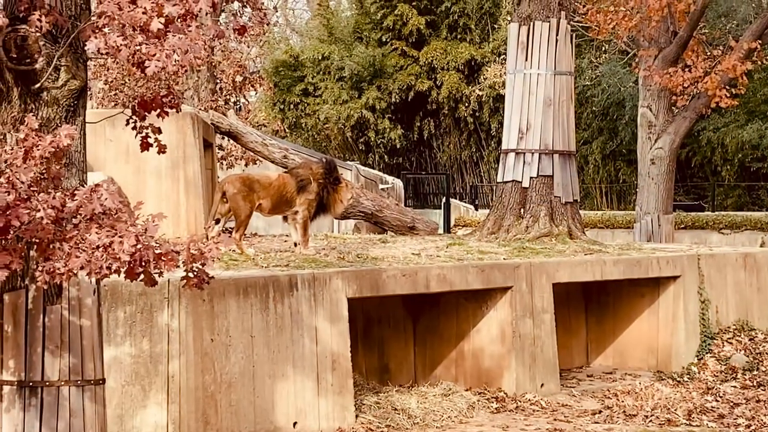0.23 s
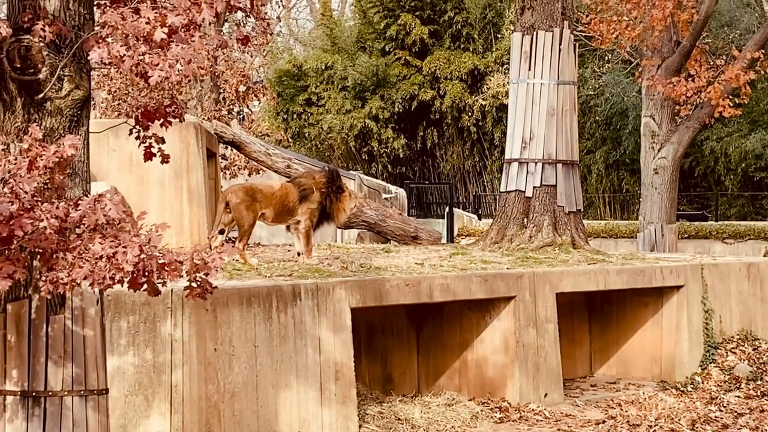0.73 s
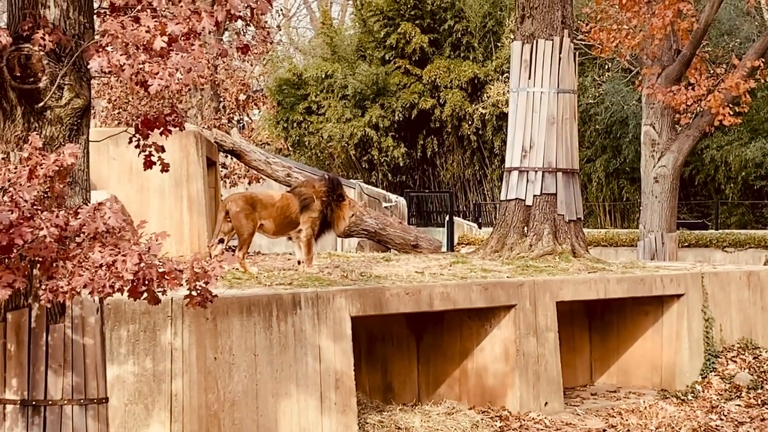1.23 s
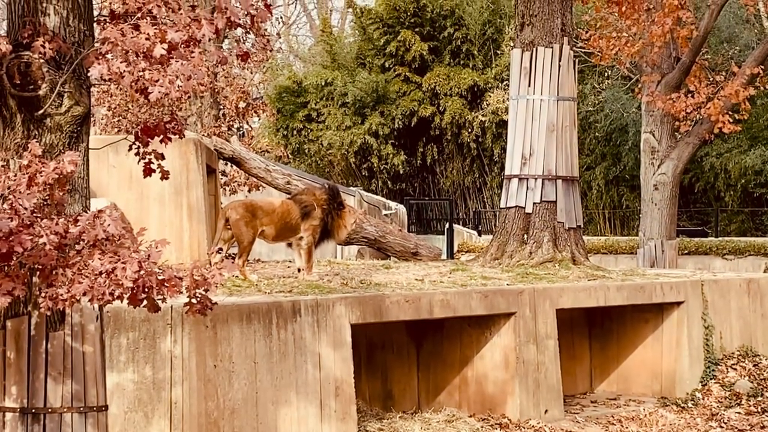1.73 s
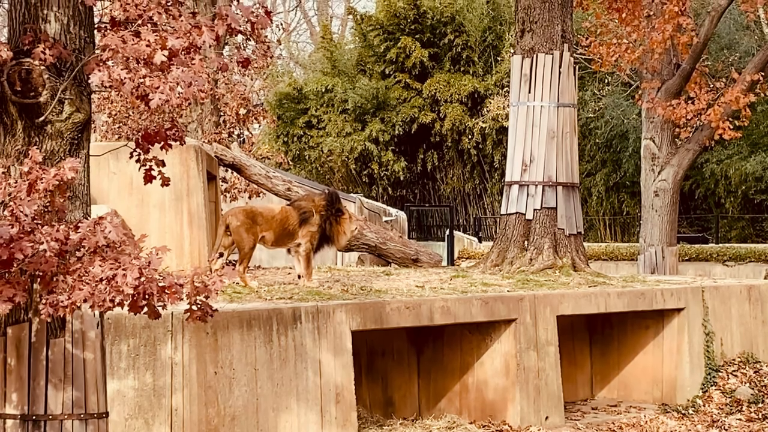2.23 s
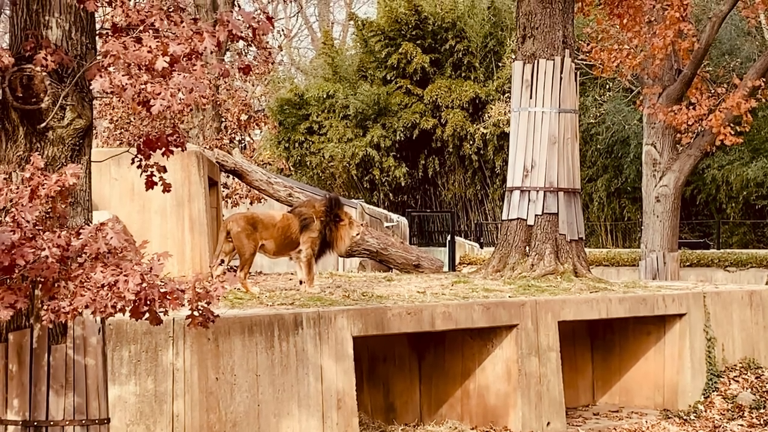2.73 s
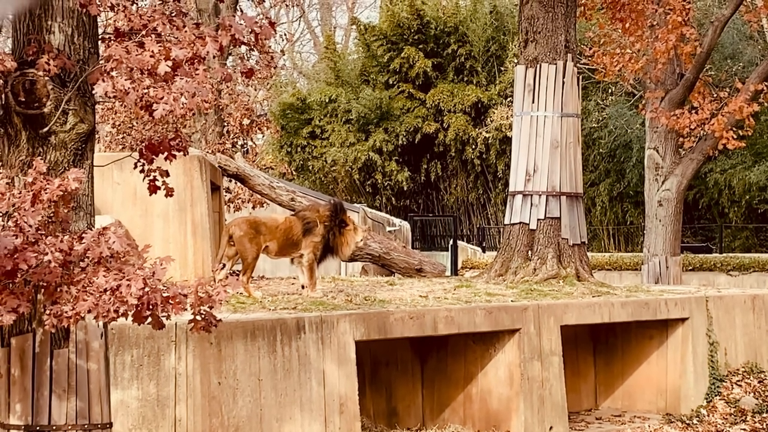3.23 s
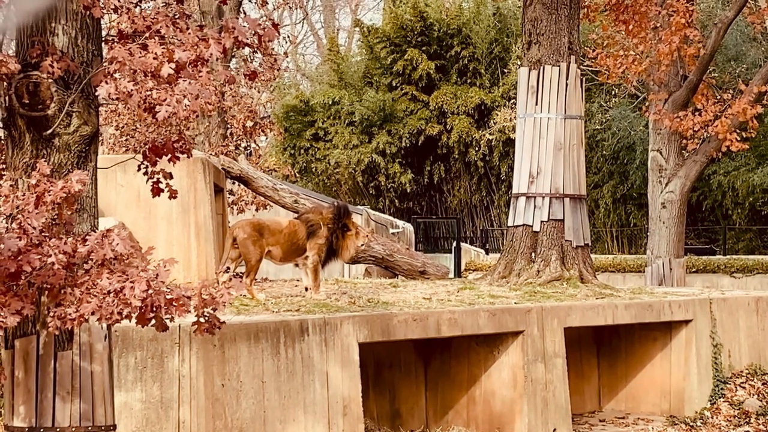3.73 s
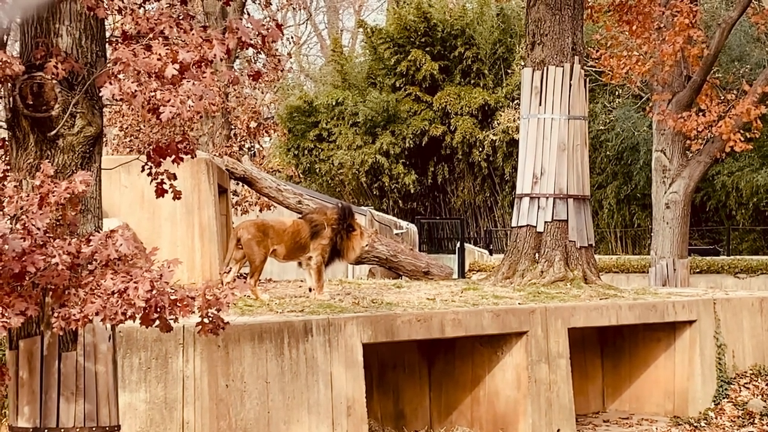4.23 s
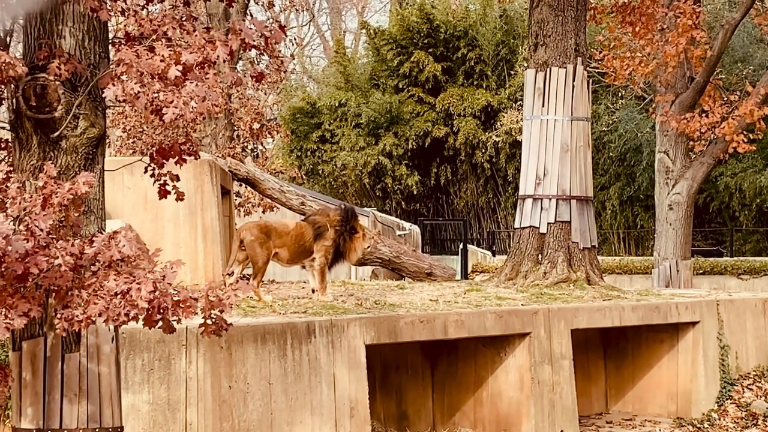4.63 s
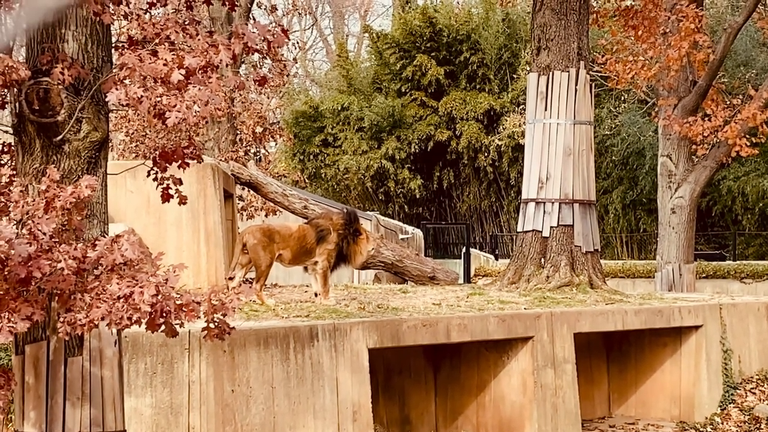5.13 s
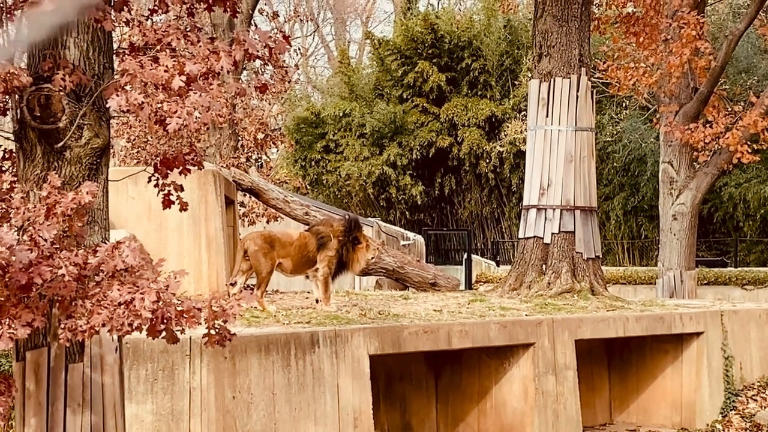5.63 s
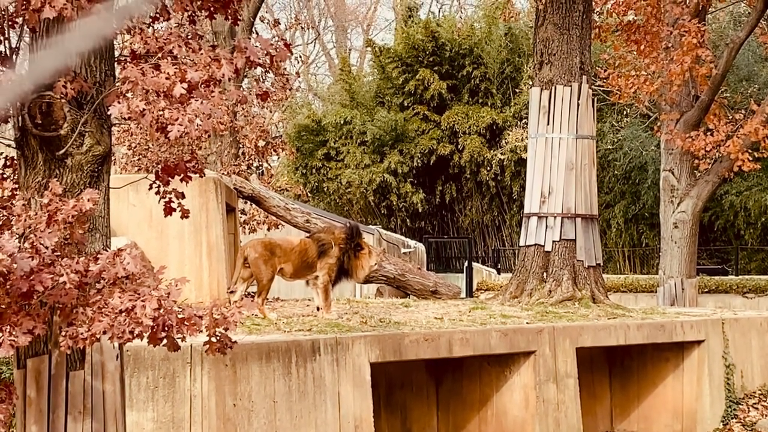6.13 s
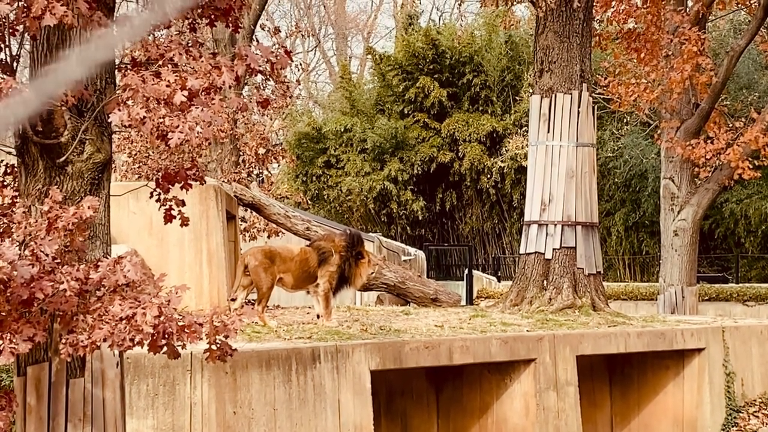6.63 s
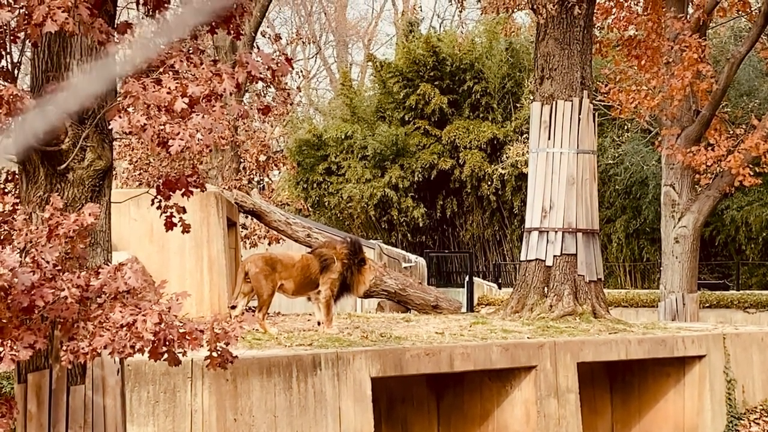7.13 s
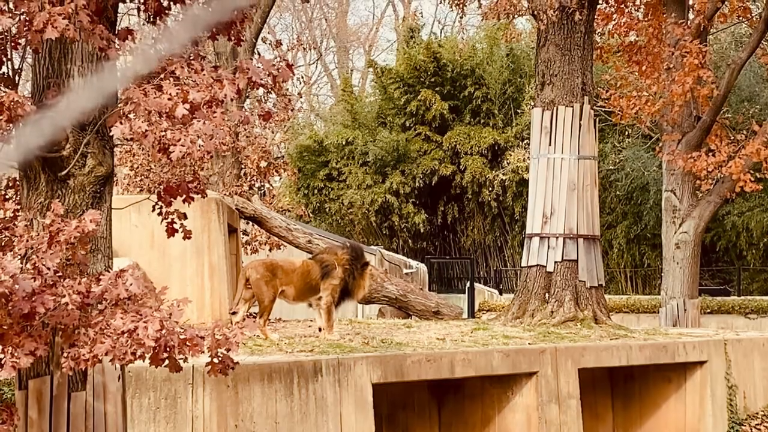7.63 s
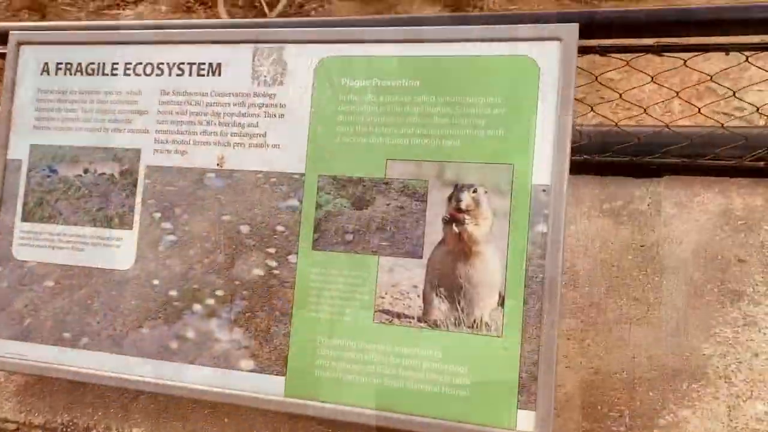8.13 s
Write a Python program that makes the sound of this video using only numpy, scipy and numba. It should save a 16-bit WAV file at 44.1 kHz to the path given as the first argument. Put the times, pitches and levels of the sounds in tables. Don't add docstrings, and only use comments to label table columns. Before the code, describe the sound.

A male lion gives two long deep roars, then five rough fading grunts, echoing off concrete walls over low distant town rumble.

```python
import sys
import numpy as np
from scipy import signal
from scipy.io import wavfile
from scipy.ndimage import uniform_filter1d
from numba import njit

SR = 44100
rng = np.random.default_rng(int(sys.argv[2]) if len(sys.argv) > 2 else 0)


def unload_audio(sound):
    columns = np.transpose(np.atleast_2d(sound))
    steps = np.round(np.clip(columns, -1, 1) * 32767)
    wavfile.write(sys.argv[1], SR, steps.astype(np.int16))


def linear_from_db(decibels):
    return 10 ** (np.asarray(decibels, float) / 20)


N = 369381


def level(x, db):
    return x * linear_from_db(db) / np.sqrt(np.mean(x ** 2))


@njit
def svf(x, hz, width):
    y, band, low = np.empty(len(x)), 0., 0.
    g, k = np.tan(np.pi * hz / SR), width / hz
    for i in range(len(x)):
        v = (band + g * (x[i] - low)) / (1 + g * (g + k))
        band = 2 * v - band
        low = low + 2 * g * v
        y[i] = k * v
    return y


def walk(rate, size):
    hold = int(SR / rate)
    steps = np.repeat(rng.standard_normal(size // hold + 1), hold)
    return 1.3 * uniform_filter1d(uniform_filter1d(steps, hold), hold)[:size]


def tract(x, modes):
    out = 0
    for k, (hz, width, db) in enumerate(modes):
        once = svf(x, 1. * hz, 1.36 * width)
        out = out + (-1) ** k * linear_from_db(db) * svf(once, 1. * hz, 1.36 * width)
    return out


def stereo(mid, side):
    return np.array([mid + side, mid - side])


def ambience(shape, db):
    out, swell = 0, walk(0.33, N)
    at_hz, at_db = np.transpose(shape)
    for hz in 25 * 2 ** np.arange(0, 9.4, 1 / 3):
        mid, side = (svf(svf(rng.standard_normal(N), hz, hz / 3), hz, hz / 3) for _ in range(2))
        band_db = np.interp(np.log(hz), np.log(at_hz), at_db) + 0.25 * swell + 1.2 * walk(9.4, N)
        out = out + linear_from_db(band_db) * stereo(mid, min(.04 + hz / 2000.0, .4) * side)
    return level(out, db)


def town():
    # f/Hz, level/dB per Hz
    spectrum = [(22, -63), (37, -11), (60, 10), (120, 9.5), (250, -5), (400, -8.5), (800, -26),
                (1600, -35.5), (3000, -43), (6000, -56), (12000, -61.5), (16000, -69)]
    return ambience(spectrum, -38)


def effort_db(s, row, fall_db_per_s, hold_s=0, jump_db=-12, swell_s=0.13):
    start, release, db = row[:3]
    rise = np.interp(s - start, (0, .035, swell_s), (jump_db + 12 - 31, jump_db, 0))
    return db + rise - fall_db_per_s * np.maximum(s - release - hold_s, 0)


def clean_voice(s, row, hum_hz, hum_db, rough, beat):
    # t/s, half length/s, depth/dB
    breaks = [(0.201, 0.03, -9), (0.292, 0.018, -6.5), (0.662, .03, -4.5), (2.23, 0.044, -19.5),
              (3.244, 0.022, -16), (3.33, 0.011, -8), (3.418, 0.017, -5), (4.124, 0.019, -20),
              (4.217, 0.046, -11.5), (4.301, 0.022, -8), (5.017, 0.035, -8.5), (5.146, .03, -8),
              (6.107, 0.01, -9.5), (6.22, 0.0077, -9), (6.311, .03, -11.5), (7.358, 0.08, -12),
              (7.522, 0.028, -28.5)]
    size = len(s)
    hum_db = hum_db + sum(db * np.clip(1 - ((s - at) / half) ** 2, 0, 1) for at, half, db in breaks)
    over_db = effort_db(s, row, 90.5, hold_s=0.045) + row[4] + 4.5 * walk(14, size)
    turns = np.cumsum(hum_hz * (1 + .02 * rough * walk(40, size))) / SR
    throb = linear_from_db(3.5 * rough * walk(30, size))
    beat_hz, share = beat
    partner = share * np.sin(2 * np.pi * (turns - beat_hz * np.arange(size) / SR))
    hum = np.sqrt(2) * (np.sin(2 * np.pi * turns) + partner) * throb * linear_from_db(hum_db)
    over = np.sqrt(2) * np.sin(4 * np.pi * turns) * linear_from_db(over_db - 17 * rough)
    return hum + over, turns


def fold_slaps(turns, rough):
    size = len(turns)
    beats = np.arange(1, int(turns[-1] / 2))
    timing, strength = rng.standard_normal((100, 2))[:len(beats)].T
    when = np.interp(2 * (beats + .15 * rough * timing), turns, np.arange(size))
    slaps = np.zeros(size)
    slaps[when.astype(int)] = linear_from_db(5 * rough * strength)
    puffs = 1.2 + signal.lfilter([1], [1, -np.exp(-1 / (0.009 * SR))], slaps)
    air = level(puffs * rng.standard_normal(size), 0)
    return level(slaps, 0), air


def chest_thump(slaps, air, mouth_db, chest_db):
    lag = np.exp(-1 / (.25 * SR))
    effort = signal.lfilter([1 - lag], [1, -lag], linear_from_db(mouth_db))
    return level(tract(.5 * slaps + air, [(56.5, 28, 0.0), (95, 14, -8)]), chest_db) * effort


def throat_growl(slaps, air, throat_db, rough):
    # f/Hz, width/Hz, level/dB
    throat = [(201, 53, 4), (307.5, 49.2, 8), (388.8, 103, 3.5), (469.4, 69, 0.5), (560, 94, -6.5),
              (672, 61, -20)]
    (low_hz, low_width, low_db), *upper = throat
    modes = [(low_hz, low_width, low_db + 7.5 * rough)] + upper
    return level(tract(slaps + 2.2 * rough * air, modes), 0) * linear_from_db(throat_db)


def mouth_rasp(s, row, slaps, air, mouth_db, rough, fangs_db):
    # f/Hz, width/Hz, level/dB
    mouth = [(766.4, 51.3, 9.5), (1020, 99, 4), (1200, 100, 0.5), (1429, 139, -9.5)]
    # f/Hz, width/Hz, level/dB
    fangs = [(1783, 110, 0), (2053, 120, -1), (2276, 110, 1), (2566, 180, -0.5), (2980, 420, -3.5)]
    # f/Hz, width/Hz, level/dB
    hiss_bands = [(3960, 2040, -37), (5500, 1700, -47), (6800, 710, -51.5), (11400, 1700, -57),
                  (15000, 2000, -64)]
    size = len(s)
    hiss = sum(level(tract(rng.standard_normal(size), [mode]), mode[2]) for mode in hiss_bands)
    jaws = linear_from_db(effort_db(s, row, 89.5, hold_s=0.026, jump_db=-15, swell_s=0.18))
    bite = (.5 * slaps + air) * linear_from_db(3.5 * rough * walk(60, size))
    rasp = level(tract(0.42 * slaps + air, fangs), fangs_db)
    return level(tract(bite, mouth), 0) * linear_from_db(mouth_db) + (rasp + 5 * hiss) * jaws


def call(row, hum_rows, rough, chest_db, fangs_db, beat):
    corner_s, *columns = np.transpose(hum_rows)
    t = np.arange(int(corner_s[0] * SR), min(int(corner_s[-1] * SR), N))
    s = t / SR
    hum_hz, hum_db = (np.interp(s, corner_s, c) for c in columns)
    mouth_db = effort_db(s, row, 119)
    throat_db = effort_db(s, row, 107.5) + row[3] + 0.33 * 4.5 * walk(14, len(t))
    voice, turns = clean_voice(s, row, hum_hz, hum_db, rough, beat)
    slaps, air = fold_slaps(turns, rough)
    rasp = chest_thump(slaps, air, mouth_db, chest_db) + throat_growl(slaps, air, throat_db, rough)
    rasp = rasp + mouth_rasp(s, row, slaps, air, mouth_db, rough, fangs_db)
    rise = (t - t[0] + N * (t[0] == 0)) / (0.005 * SR)
    fade = np.clip(np.minimum(rise, (t[-1] - t) / (.06 * SR)), 0, 1)
    out = np.zeros((2, N))
    out[:, t] = np.array([voice, rasp]) * fade
    return out


@njit
def walls(x, lags, gain, damp):
    line, soft, out = np.zeros((8, 8192)), np.zeros(8), np.zeros((2, len(x)))
    for i in range(len(x)):
        total = 0.
        for k in range(8):
            soft[k] += (1 - damp) * (gain[k] * line[k, (i - lags[k]) & 8191] - soft[k])
            total += soft[k]
            out[k % 2, i] += soft[k]
        for k in range(8):
            line[k, i & 8191] = x[i] + soft[k] - total / 4
    return out


def yard_echo(tone, rasp):
    lags = np.array([1031, 1523, 1987, 2467, 3049, 3671, 4327, 5153])
    gain = linear_from_db(-60 * lags / SR / 1.123)
    return linear_from_db(-21.5) * walls(0.79 * tone + rasp + 1e-18, lags, gain, 0.086)


def sags():
    # t/s, length/s, from f/Hz, to f/Hz, level/dB
    partials = [(0.108, 0.078, 394, 422, -21.5), (0.185, 0.099, 423.6, 416, -26),
                (.56, 0.11, 414.5, 406, -29), (0.659, 0.24, 125, 112.6, -26.5),
                (.93, 0.079, 105, 90.3, -34.5), (1.117, 0.2, 344, 359, -45), (1.349, 0.24, 343, 343, -49),
                (1.818, 0.094, 377.7, 382.6, -30.5), (1.937, 0.12, 381, 360, -24),
                (2.19, 0.097, 126.9, 104, -26.5), (3.065, 0.1, 419, 446.5, -32),
                (3.567, 0.12, 103.2, 95, -37), (6.109, 0.17, 308.4, 337, -35),
                (7.252, 0.042, 404, 371, -35.5)]
    out, waver, flutter = np.zeros(N), 1 + .02 * walk(25, N), linear_from_db(3 * walk(30, N))
    for s, length, from_hz, to_hz, db in partials:
        at = np.arange(int(s * SR), int((s + length) * SR))
        hz = np.linspace(from_hz, to_hz, len(at)) * waver[at]
        out[at] += linear_from_db(db) * 2 * np.hanning(len(at)) * np.sin(2 * np.pi * np.cumsum(hz) / SR)
    return out * flutter


def ticks():
    # t/s, level/dB, f/Hz, width/Hz, t60/s
    snaps = [(1.55, -79, 992, 1970, 0.036), (2.696, -75, 1200, 3110, 0.022),
             (2.758, -51, 1834, 4880, 0.042), (4.491, -48, 854, 1200, 0.045),
             (5.658, -45, 550, 1200, 0.095), (5.667, -53, 1492, 6070, 0.078),
             (6.556, -63, 4502, 2960, 0.21), (6.927, -66, 900, 2000, .04), (7.017, -72, 890, 2000, .04),
             (7.785, -60, 2090, 600, .05), (7.871, -61, 5500, 3020, 0.061)]
    out, t = np.zeros(N), np.arange(SR // 5) / SR
    for s, db, hz, width, t60 in snaps:
        burst = level(tract(rng.standard_normal(len(t)), [(hz, width, 0)]), db) * 1000 ** (-t / t60)
        out[int(s * SR):int(s * SR) + len(t)] += burst
    return out


def grunt_hum(row, hum):
    (start, release, *_), (hz, db, peak, end) = row, hum
    scoop_hz, drop_s, drop_db = .94 * hz, release + 0.16, db - 9
    return [(start, scoop_hz, db - 30), (start + .095, scoop_hz, db - 5),
            (max(peak, start + .13), hz, db), (drop_s, hz, drop_db),
            (end, hz, drop_db - 26 * (end - drop_s))]


def lion_calls():
    # t/s, breath lets go/s, effort level/dB, throat over effort/dB, overtone over effort/dB
    calls = [
        (-.12, 0.622, -34, 9, 7.5),
        (1.685, 2.139, -37, 11.5, 5.5),
        (2.959, 3.205, -37, 9, 13),
        (3.914, 4.129, -38.5, 12, 4),
        (4.865, 5.084, -38.5, 12.5, 6),
        (5.884, 6.105, -39.5, 11, 5),
        (7.12, 7.382, -43.5, 13, 11),
    ]
    # t/s, f/Hz, level/dB
    roar_hum = [
        [(0.0, 156.7, -22), (0.082, 154.3, -10.5), (0.308, 158.8, -21.5), (0.392, 159.3, -9),
         (0.542, 155.2, -12.5), (0.686, 161.8, -20.5), (0.808, 156.3, -23.5), (1.086, 155.9, -31),
         (1.1, 157.9, -51)],
        [(1.7, 141, -47.5), (1.774, 141.8, -23.5), (1.806, 146, -31), (1.834, 150.3, -11),
         (1.968, 154.1, -12.5), (2.024, 147.2, -11.5), (2.344, 146.8, -27.5), (2.43, 153.2, -25.5),
         (2.56, 149, -31.5)],
    ]
    # f/Hz, level/dB, peak t/s, dies t/s
    grunt_hums = [(147.8, -18, 3.19, 3.54), (130.2, -18, 4.16, 4.49), (132, -19, 5.0, 5.6),
                  (129.7, -19.5, 6.14, 6.6), (126.8, -19, 7.27, 7.8)]
    rough = [.2, .25, .35, .6, .7, .65, .6]
    chest_db = [-16, 6.5, 10.5, 7.5, 10.5, 10, 12]
    fangs_db = [-12, -10.5, -10.5, -12, -11.5, -12.5, -13.5]
    # beats/Hz, share
    beats = [(7.9, 0.07), (11, 0.18), (17.07, 0.61), (13, 0.36), (17, .5), (14, 0.45), (11.5, 0.17)]
    hums = list(roar_hum) + [grunt_hum(*each) for each in zip(calls[2:], grunt_hums)]
    return sum(call(*each) for each in zip(calls, hums, rough, chest_db, fangs_db, beats))


def path():
    # f/Hz, level/dB per Hz
    spectrum = [(30, -16.5), (100, 0.5), (250, -15), (800, -17), (1600, -31), (2600, -30.5), (4000, -36),
                (8000, -42.5), (11000, -43.5), (16000, -50)]
    whir = level(tract(rng.standard_normal(N), [(2070, 220, 0)]), -69.5) * linear_from_db(3 * walk(13, N))
    return ambience(spectrum, -51.5) + whir


def scene():
    # start t/s, end t/s
    dissolve_s = (7.49, 8.22)
    tone, rasp = lion_calls()
    tone = tone + sags()
    lion = tone + rasp
    left, right = yard_echo(tone, rasp)
    echo_side = .9 * svf(left - right, 1000., 2500.) + .3 * svf(left - right, 140., 100.)
    ground_side = .25 * svf(np.pad(lion, (6, 0))[:N], 900., 700.) - 0.084 * svf(lion, 280., 260.)
    yard = stereo(lion + left + right + ticks(), echo_side + ground_side) + town()
    mix = np.interp(np.arange(N) / SR, dissolve_s, (0, 1))
    return yard * (1 - 0.62 * mix) + path() * mix


def low_pass(x):
    return signal.sosfilt(signal.butter(12, 15700, fs=SR, output="sos"), x)


def record(dry):
    # low f/Hz, high f/Hz
    dead_hz = [(8400, 9500), (12800, 13900)]
    whine = linear_from_db(-68) * np.cos(2 * np.pi * 12000 * np.arange(N) / SR)
    rounded = np.tanh(1.132 * dry) / 1.078 * (1 + whine)
    x = signal.sosfilt(signal.butter(2, 30., "high", fs=SR, output="sos"), rounded)
    for band in dead_hz:
        x = signal.sosfilt(signal.butter(3, band, "bandstop", fs=SR, output="sos"), x)
    return low_pass(x)


dry = scene()
out = record(dry)
unload_audio(out)
```